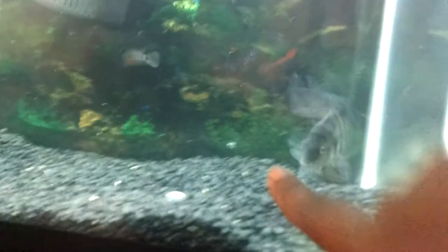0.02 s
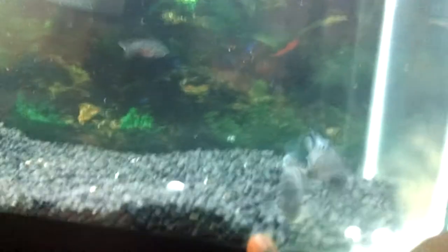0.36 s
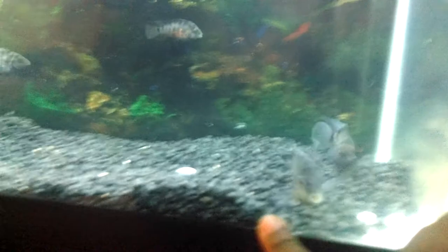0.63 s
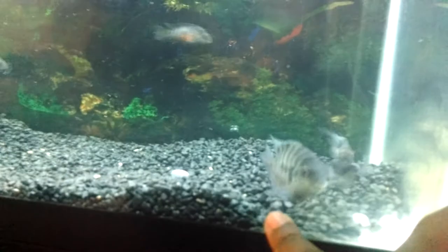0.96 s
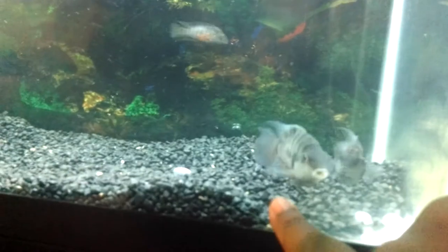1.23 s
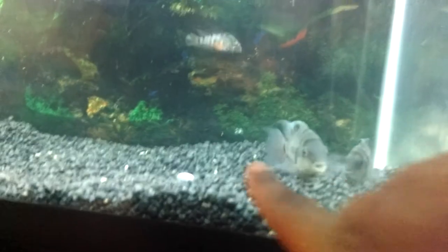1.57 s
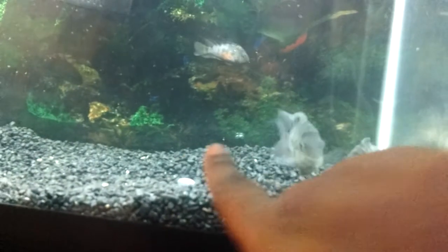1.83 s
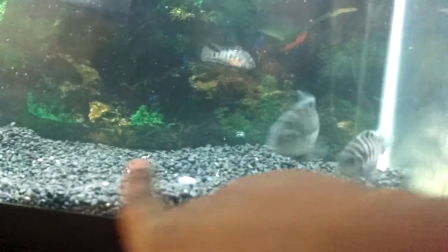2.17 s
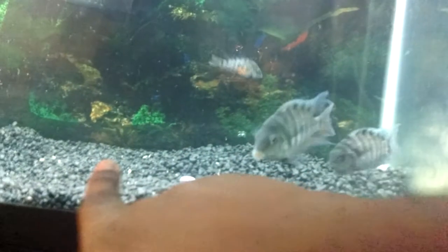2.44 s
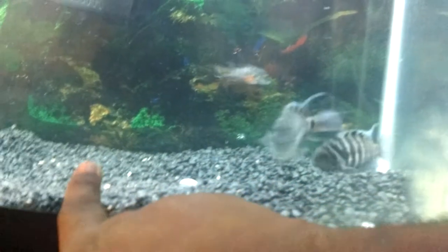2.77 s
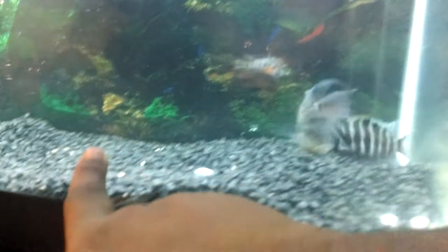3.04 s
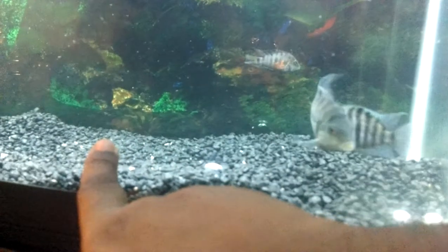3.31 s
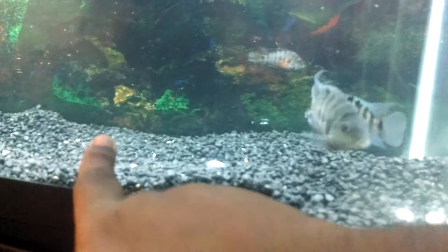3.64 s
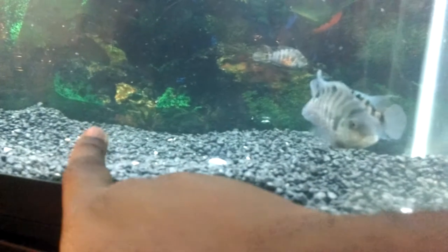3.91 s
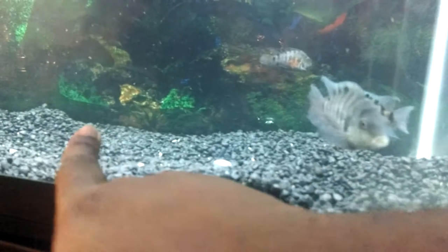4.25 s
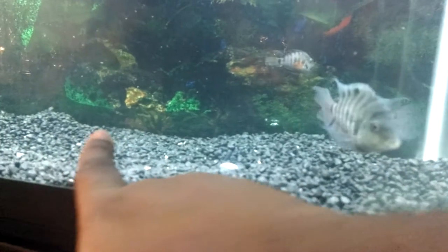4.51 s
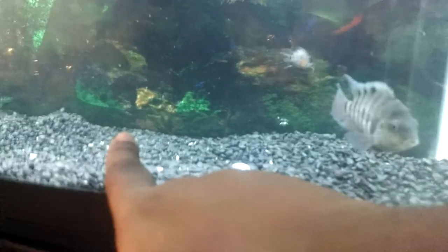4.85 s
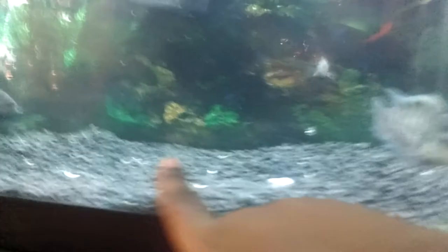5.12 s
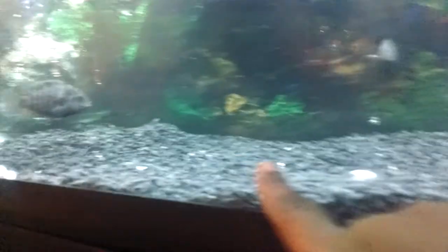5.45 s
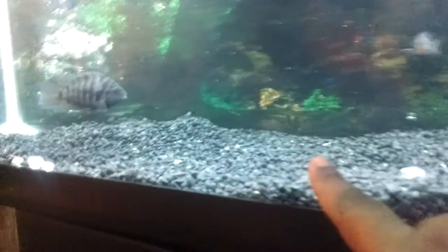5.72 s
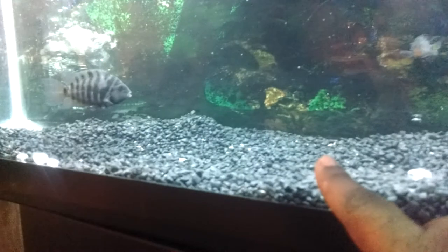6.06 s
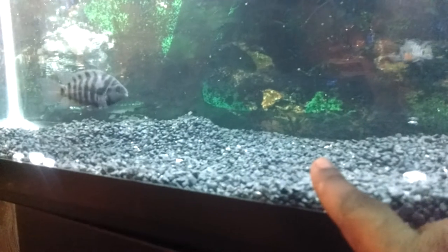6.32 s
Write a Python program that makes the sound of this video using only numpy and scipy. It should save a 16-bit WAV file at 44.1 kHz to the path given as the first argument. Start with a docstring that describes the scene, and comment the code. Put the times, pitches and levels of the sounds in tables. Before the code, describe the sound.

Steady aquarium bubbling runs under a short hollow drag, dull finger taps on glass, microphone bumps and a few gritty scrapes.

```python
"""At an aquarium, heard from a phone in front of the tank: the filter fizzes and gurgles over a faint
pump hum, and a finger taps the glass and rubs on it or on the phone's case. Out of sight something
hollow is dragged a short way, sticking and slipping in a few squeaking shoves; later come three gritty
scrapes and a few softer swishes, all blurred by the room. The holding hand bumps and knocks the phone,
which widens the airborne sound by subtracting each of its two microphone ports from the other."""
import sys
import numpy as np
from scipy import signal
from scipy.fft import rfft, irfft
from scipy.io import wavfile

SR = 44100
rng = np.random.default_rng(int(sys.argv[2]) if len(sys.argv) > 2 else 0)


def dump_mix(stems):
    """Bounce the given channels to the path in sys.argv[1] as a 16-bit WAV at rate SR."""
    frames = np.atleast_2d(stems).T  # one column per channel
    limited = np.clip(frames, -1, 1)  # hard clip at full scale
    pcm = np.round(limited * 32767).astype(np.int16)
    wavfile.write(sys.argv[1], SR, pcm)


N = 290178
T = np.arange(N) / SR
F = np.maximum(np.fft.rfftfreq(N, 1 / SR), 1)
SECOND = T[:SR]
PORT_LAG_S = .000392

# Tone of the filter's fizz. Each row: frequency in Hz, relative level in dB.
FIZZ_COLOUR = [(20, -11), (35, -12), (55, 4.5), (85, -7), (170, -3.5), (260, -3.5), (480, -3.5), (750, -11),
               (1050, -12), (1700, -12.5), (2700, -13.5), (8000, -13), (15000, -15)]
# The pump's partials. Each row: pitch in Hz, level in dB before the phone moves, level in dB after.
PUMP_PARTIALS = [(58, -63, -71), (121, -67.5, -75), (244, -56, -56.5), (289.4, -64, -71.5),
                 (351, -59.5, -58), (450, -65, -64), (528, -56, -68), (587, -61.5, -74), (642, -61.5, -67),
                 (701, -66, -58.5), (764, -73, -63.5)]
# Shoves of the hollow thing. Each row: hardest push in seconds, rise and fade time constants in
# seconds, then the drive in dB of the grit, of the rumble and of the upper modes.
SHOVES = [(.055, 0.09, 0.066, -24.5, -27, -20), (0.1, 0.041, 0.026, -19, -16.5, -20),
          (.155, 0.032, 0.032, -23, -17, -45), (0.219, 0.044, 0.059, -20, -19.5, -25.5)]
# Tone of its dragging foot. Each row: frequency in Hz, relative level in dB.
DRAG_COLOUR = [(25, -19), (80, -7.5), (150, -3), (260, -8), (380, -3.5), (600, -3), (800, -8.5),
               (1300, -13), (2200, -12.5), (4500, -18), (7000, -18), (11000, -25), (15000, -22.5)]
# Its body's modes. Each row: pitch in Hz, relative level in dB, t60 in seconds, wobble in radians.
BODY_MODES = [(220, -8, .2, 0.47), (270.5, 5.5, 0.18, 0.24), (408, -4, 0.2, 0.42), (434.5, -3.5, .25, 0.38),
              (543, -5, 0.3, 0.41), (569, 0, 0.37, .35), (961, -8.5, 0.71, 0.33), (1019, -7, 0.56, .4),
              (1334, -9, 0.46, 0.38), (1455, -20, .19, .45), (1627, -14.5, 0.29, 0.33),
              (1780, -14, 0.43, 0.81), (2140, -12, .35, 0.59), (3730, -28, .3, 0.88)]
# Squeaks of the drag and the scrapes. Each row: middle in seconds, half length in seconds,
# level in dB, pitch in Hz, glide in Hz per second.
SQUEAKS = [(.055, 0.061, -25, 1018, -300), (.06, 0.046, -29, 1455, 100), (.1, 0.029, -25, 1328, -200),
           (.117, 0.014, -10, 549, 600), (.2, .02, -22.5, 629, 0), (0.228, 0.044, -33, 3665, -300),
           (.25, 0.024, -26, 1345, 100), (3.812, 0.01, -26, 695, 300), (3.83, 0.017, -22.5, 1420, 1500),
           (3.898, 0.0059, -13.5, 1490, 1200), (3.937, 0.018, -24, 1527, 800),
           (3.976, 0.012, -31, 1530, 300), (3.995, 0.023, -31, 2020, 200),
           (4.297, 0.032, -45.5, 1310, -100), (5.255, .022, -39, 3390, -400)]
# Finger taps on the glass. Each row: start in seconds, strength in dB.
GLASS_TAPS = [(0.1082, -2), (0.2129, -10), (4.913, -23), (4.932, -31), (5.0366, -25), (5.049, -29),
              (5.554, -23)]
# The pane's water-damped modes. Each row: pitch in Hz, relative level in dB, t60 in seconds.
PANE_MODES = [(295, -19, 0.13), (450, -9, 0.019), (594, -17, 0.019), (990, -25, 0.024)]
# Finger rubs, on the glass or the phone's case. Each row: middle in seconds, half length in seconds,
# level in dB, chatter pitch in Hz, chatter against the rub in dB.
FINGER_RUBS = [(0.51, 0.045, -37, 275, 1), (0.601, 0.025, -41, 560, -5), (2.498, 0.35, -45, 480, -1),
               (2.722, 0.034, -37, 510, -2), (2.957, 0.2, -43.5, 295, -3), (3.084, 0.033, -39.5, 398, 1),
               (4.912, 0.031, -40.5, 950, 10), (4.927, 0.04, -35, 430, 12), (5.035, 0.016, -38, 392, 15),
               (5.296, 0.063, -35, 366, -4), (5.544, 0.043, -37, 334, 6), (5.943, 0.012, -41.5, 724, 0)]
# Tone of a rubbing fingertip. Each row: frequency in Hz, relative level in dB.
FINGER_COLOUR = [(60, -4), (180, 0), (330, -2), (560, -5), (900, -14.5), (2000, -8.5), (4000, -16),
                 (12000, -49)]
# The hand bumps the phone. Each row: start in seconds, level in dB.
HAND_BUMPS = [(2.345, -25), (2.96, -31.5), (3.55, -29), (3.59, -26)]
# A finger knocks on the case. Each row: start in seconds, level in dB, pitch in Hz, nail tick in dB.
CASE_KNOCKS = [(2.749, -15.5, 504, -20), (2.771, -27, 400, -48), (2.9335, -21.5, 400, -48),
               (3.0661, -23, 390, -48), (3.08, -15.5, 402, -46), (3.094, -19.5, 410, -48)]
# Scrapes and swishes. Each row: start in seconds, rise in seconds, fade time constant in seconds,
# level in dB, tilt in dB per octave, then surface ring, thud and edge in dB against the grit.
SCRAPE_STROKES = [(3.799, 0.02, 0.034, -13.5, 2.5, -12, -21.5, -21),
                  (3.863, 0.036, 0.036, -16.5, 2.5, -16, -27, -18),
                  (3.922, 0.046, 0.041, -18.5, 2, -10, -16, -24),
                  (5.228, 0.028, 0.051, -25.5, 0.5, -40, -25, -10.5),
                  (5.39, 0.049, 0.14, -31.5, -1.3, -32, -13, -17),
                  (5.524, 0.023, 0.038, -23.5, 9, -24, -25, -17.5),
                  (5.838, 0.024, 0.037, -27.5, 5, -23, -16, -15.5)]
# Tone of the scrapes' grit. Each row: frequency in Hz, relative level in dB.
GRIT_COLOUR = [(60, -2), (250, -12), (550, 4.5), (1000, 3), (2000, 2), (3500, -3), (5000, -2.5),
               (8000, -4.5), (15000, -9.5)]
# Resonances of the scraped surface. Each row: centre in Hz, width in Hz, relative level in dB.
SURFACE_RESONANCES = [(433, 240, 0), (585, 260, -0.5), (710, 154, -8), (818, 240, -2.5), (975, 350, -2),
                      (1236, 360, 2.5), (1430, 290, -2), (1720, 330, -4)]
# Cross-feed that sets how alike the channels are. Each row: frequency in Hz, weight of the right
# port taken from the left, weight of the left taken from the right.
CROSS_FEED = [(61, 3.11, -2.58), (195, 0.69, -0.32), (408, 0.39, -0.84), (675, 0.93, 0.68),
              (1560, 0.14, 0.41), (2040, 0.48, 0.17), (2536, 0.78, 0.43), (3050, 0.37, 0.31),
              (3500, 0.76, 0.21), (5640, 0.19, 0.11), (8100, 0.23, 0.26), (11100, 0.28, 0.25),
              (15000, 0.56, 0.61)]
# Lean of the stereo image. Each row: frequency in Hz, left over right in dB.
STEREO_LEAN = [(60, -8.5), (110, -9), (200, -1.5), (500, -3), (740, 2.5), (1100, -0.7), (15000, 0)]


def undb(db):
    """Decibels to gain."""
    return 10 ** (np.asarray(db) / 20)


def unit(x):
    """Scale to rms 1."""
    return x / np.sqrt(np.mean(x ** 2))


def add(out, x, start):
    """Mix a short sound in at its start time."""
    first = int(start * SR)
    x = x[..., max(-first, 0):]
    part = out[:, max(first, 0):][:, :x.shape[-1]]
    part += x[..., :part.shape[1]]


def along_hz(table, axis=1, at=F):
    """One column of a table, joined on a log-frequency axis."""
    rows = np.array(table, float)
    return np.interp(np.log(at), np.log(rows[:, 0]), rows[:, axis])


def shape(x, response):
    """Filter by a response given as a function of Hz; rms 1."""
    size = x.shape[-1]
    hz = np.maximum(np.fft.rfftfreq(size, 1 / SR), 1)
    return unit(irfft(rfft(x) * response(hz), size))


def colour(x, table, tilt_db=0):
    """EQ a sound to a tone curve, tilted by so many dB an octave."""
    return shape(x, lambda f: undb(along_hz(table, at=f) + tilt_db * np.log2(f)))


def resonate(x, hz, width_hz):
    """One steep resonance."""
    return shape(x, lambda f: 1 / (1 + 1j * (f ** 2 - hz ** 2) / (f * width_hz)) ** 2)


def walk(rate, size=N):
    """A random wander, so many steps a second, with a spread near 1."""
    steps = rng.standard_normal(2048)
    return 1.22 * np.interp(T[:size] * rate, np.arange(len(steps)), steps)


def grains(rate, spread_db, size=SR):
    """Random clicks of uneven strength at each port."""
    strength = rng.choice([-1, 1], (2, size)) * undb(spread_db * rng.uniform(-0.9, 1, (2, size)))
    return unit(strength * (rng.random((2, size)) < rate / SR))


def reflect(x, share_db, fade_s, count=40):
    """Near surfaces send back early echoes, which ripple the spectrum."""
    lags = fade_s * rng.exponential(size=(count, 2))
    echoes = np.zeros(x.shape)
    echoes[[0, 1], (lags * SR).astype(int)] = rng.standard_normal((count, 2)) / np.sqrt(count)
    return shape(x, lambda f: 1 + undb(share_db) * rfft(echoes))


def room(x, wet_db, t60_low, t60_high):
    """Add the room's diffuse tail, with one decay time below 1800 Hz and one above."""
    noise = rng.standard_normal((2, SR))
    low = signal.sosfilt(signal.butter(2, 1800, fs=SR, output="sos"), noise)
    decay = -np.log(1000) * SECOND
    tail = low * np.exp(decay / t60_low) + (noise - low) * np.exp(decay / t60_high)
    tail *= 1 - np.exp(-SECOND / 0.011)
    tail /= np.sqrt(np.sum(tail ** 2, axis=1, keepdims=True))
    return x + undb(wet_db) * signal.fftconvolve(x, tail, axes=1)[:, :N]


def ring(hz, t60):
    """A struck mode."""
    return np.sin(2 * np.pi * hz * SECOND) * np.exp(-np.minimum(np.log(1000) * SECOND / t60, 20))


def bubbles(low_hz, high_hz, cycles, count):
    """Each bubble rings out over so many cycles and rises in pitch as it nears the surface."""
    out, t = np.zeros((2, N + SR)), T[:SR // 8]
    for when, pitch, _, side in rng.random((count, 4)):
        hz = low_hz * (high_hz / low_hz) ** pitch
        life = t * hz / cycles
        note = np.sin(2 * np.pi * cycles * life * (1 + 0.28 * life)) * np.exp(-np.log(1000) * life)
        pan = [np.cos(2 * np.pi * side), np.sin(2 * np.pi * side)]
        add(out, np.outer(pan, note), when * N / SR)
    return unit(out[:, :N])


def pump(moved):
    """The pump hums on wavering partials whose balance shifts as the phone moves."""
    out = np.zeros((2, N))
    for hz, before_db, after_db in PUMP_PARTIALS:
        level = undb(before_db * (1 - moved) + after_db * moved + 1.2 * walk(5))
        drift = .7 * np.array([walk(5), walk(5)])
        out += np.sqrt(2) * level * np.sin(2 * np.pi * hz * T + drift)
    return out


def aquarium(move_s=5.07, move_ease_s=0.38):
    """The bed: fine fizz, larger bubbles gurgling behind the glass, and the pump."""
    pops = reflect(grains(rate=26000, spread_db=9, size=N), share_db=-11, fade_s=.004)
    fizz = colour(pops, FIZZ_COLOUR) * undb(-38.0 + 0.056 * walk(3.0))
    churn = signal.sosfiltfilt(signal.butter(2, 650, fs=SR, output="sos"), fizz)
    hum_swell = undb(-54.5) * resonate(rng.standard_normal((2, N)), hz=718, width_hz=160)
    gurgle = undb(-50.0) * bubbles(low_hz=234.4, high_hz=535, cycles=32.0, count=1100)
    # the phone moves along the tank: the gurgle recedes and the pump's hum near 720 Hz grows louder
    moved = (1 + np.tanh((T - move_s) / move_ease_s)) / 2
    nearness = undb(0.9 * (1 - moved) - moved)
    return fizz - churn + nearness * (churn + gurgle) + pump(moved) + moved * hum_swell


def shove(peak_s, rise_s, fade_s):
    """The push of one shove: it builds up to 1 and lets go."""
    since = SECOND - peak_s
    return np.exp(np.minimum(since / rise_s, -since / fade_s))


def pushes():
    """How hard all the shoves together drive the grit, the rumble and the upper modes."""
    each = []
    for s, rise, fade, grit_db, rumble_db, ring_db in SHOVES:
        push = shove(s, rise, fade)
        rumble = shove(s + 0.002, rise, fade) ** 1.05  # a touch later and steeper than the push
        each.append([undb(grit_db) * push, undb(rumble_db) * rumble, undb(ring_db) * push])
    return np.linalg.norm(each, axis=0)


def drag(jerk_hz=105, crossover_hz=750):
    """The foot of a hollow thing sticks and slips, so grit crunches under it in jerks; the shoves ring its
    body."""
    grit, rumble, upper_drive = pushes()
    slip_phase = np.cumsum(jerk_hz * undb(3.0 * walk(90, SR))) / SR % 1
    jerks = unit(1.9 + np.exp(-slip_phase / 0.12))
    crunch = grains(rate=12000, spread_db=3.5) * jerks
    rasp = colour(reflect(crunch, share_db=-1.5, fade_s=.006), DRAG_COLOUR)
    thud = signal.sosfiltfilt(signal.butter(2, crossover_hz, fs=SR, output="sos"), rasp)
    rub = np.zeros((2, N))
    add(rub, rumble * thud + grit * (rasp - thud), 0)
    out = room(rub, wet_db=-7.5, t60_low=0.69, t60_high=0.94)
    # each mode swells under the shoves, shaking in level and phase, and rings on after them
    for hz, mode_db, t60, wobble in BODY_MODES:
        push = rumble if hz < crossover_hz else upper_drive
        sustain = np.exp(-2 * np.log(1000) / (t60 * SR))
        energy = signal.lfilter([1 - sustain], [1, -sustain], push ** 2)
        swing = np.sqrt(energy) * undb(5 * wobble * walk(60, SR))
        jog = wobble * np.array([walk(50, SR), walk(50, SR)]) + rng.uniform(0, 2 * np.pi, (2, 1))
        add(out, undb(mode_db - 3.5) * swing * np.sin(2 * np.pi * hz * SECOND + jog), 0)
    return out


def squeaks():
    """Where the sliding contact catches, it sings briefly on one rough, gliding note."""
    out, t = np.zeros((2, N)), SECOND - .5
    port_phase = np.array([[0], [np.pi / 2]])
    for middle, half, db, hz, glide in SQUEAKS:
        pressure = np.exp(-np.minimum((t / half) ** 2, 20)) * undb(2.0 * walk(147, SR))
        jog = .5 * np.array([walk(110, SR), walk(110, SR)])
        phase = 2 * np.pi * (hz * t + glide * t ** 2 / 2)
        add(out, undb(db) * pressure * np.sin(phase + jog + port_phase), middle - .5)
    return room(out, wet_db=-16, t60_low=0.77, t60_high=0.75)


def finger():
    """A fingertip taps the pane with a dull knock and stutters over the glass or the phone's case."""
    out = np.zeros((2, N))
    knock = sum(undb(db) * ring(hz, t60) for hz, db, t60 in PANE_MODES)
    for start, db in GLASS_TAPS:
        add(out, undb(db) * knock, start)
    for middle, half, db, chatter_hz, chatter_db in FINGER_RUBS:
        pressure = np.exp(-np.minimum(((SECOND - .5) / half) ** 2, 20))
        stutter = grains(rate=1200, spread_db=5.5)
        chatter = undb(chatter_db) * resonate(stutter, chatter_hz, width_hz=330)
        slide = unit(colour(stutter, FINGER_COLOUR) + chatter)
        add(out, undb(db) * pressure * slide, middle - .5)
    return room(out, wet_db=-8.5, t60_low=0.72, t60_high=0.45)


def handling(attack_cycles=0.36, far_port_db=-13):
    """The hand thumps and knocks the case by the right port; the left gets it late, weak and inverted."""
    out = np.zeros((1, N))
    for start, db in HAND_BUMPS:
        add(out, undb(db) * ring(hz=34.0, t60=0.16), start)
    for start, db, hz, nail_db in CASE_KNOCKS:
        age = np.minimum(SECOND * hz / attack_cycles, 30)
        knock = age * np.exp(1 - age) * np.sin(2 * np.pi * hz * SECOND)
        add(out, undb(db) * knock + undb(nail_db) * ring(hz=1960, t60=0.006), start)
    left = -undb(far_port_db) * np.roll(out[0], int(PORT_LAG_S * SR))
    return np.array([left, out[0]])


def scrapes():
    """Each stroke speeds up and dies away: dense grains crackle and ring the surface and the scraper."""
    out = np.zeros((2, N))
    for start, rise, fade, db, tilt_db, ring_db, thud_db, edge_db in SCRAPE_STROKES:
        speed = np.minimum(SECOND / rise, 1) ** 0.57 * np.exp(-np.maximum(SECOND - rise, 0) / fade)
        crackle = reflect(grains(rate=7500, spread_db=7), share_db=3, fade_s=.005)
        grit = colour(crackle, GRIT_COLOUR, tilt_db)
        surface = unit(sum(undb(peak_db) * resonate(crackle, hz, width)
                           for hz, width, peak_db in SURFACE_RESONANCES))
        thud = undb(thud_db) * resonate(crackle, hz=255, width_hz=660)
        edge = undb(edge_db) * resonate(crackle, hz=3360, width_hz=1140)
        add(out, undb(db) * speed * (grit + undb(ring_db) * surface + thud + edge), start)
    return room(out, wet_db=-15.0, t60_low=1.0, t60_high=0.46)


def widen(ports):
    """Stereo widening: make the channels as alike as a late, inverted cross-feed would leave them."""
    left, other = rfft(ports)
    late = np.exp(-2j * np.pi * F * PORT_LAG_S)
    diffuse = 0.11 * np.sinc(2 * F * PORT_LAG_S)  # diffuse sound is alike at both ports only in the bass
    likeness = diffuse - along_hz(CROSS_FEED, axis=1) * late - along_hz(CROSS_FEED, axis=2) / late
    likeness /= np.maximum(1, abs(likeness) / .999)
    right = np.conj(likeness) * left + np.sqrt(1 - abs(likeness) ** 2) * other
    lean = undb(along_hz(STEREO_LEAN) / 2)
    return irfft(np.array([left * lean, right / lean]), N)


def scene():
    """The mix: what reaches the two ports through the air, and what comes through the case."""
    airborne = aquarium() + drag() + scrapes() + squeaks() + finger()
    return widen(airborne) + handling()


def record(dry):
    """The phone cuts the top steeply at 15450 Hz."""
    return signal.sosfilt(signal.ellip(10, .2, 80, 15450, fs=SR, output="sos"), dry)


dry = scene()
out = record(dry)
dump_mix(out)
```